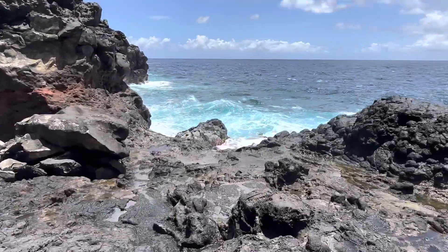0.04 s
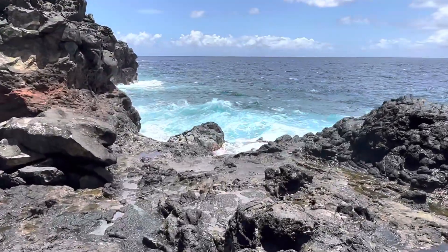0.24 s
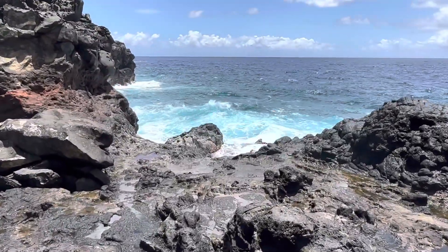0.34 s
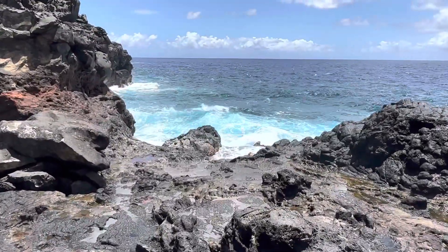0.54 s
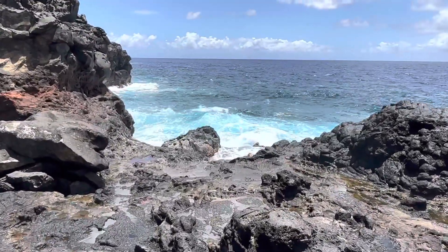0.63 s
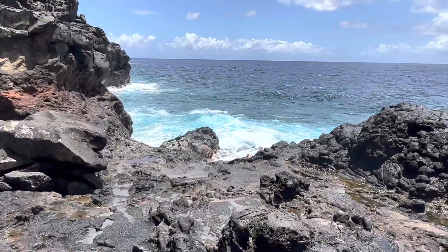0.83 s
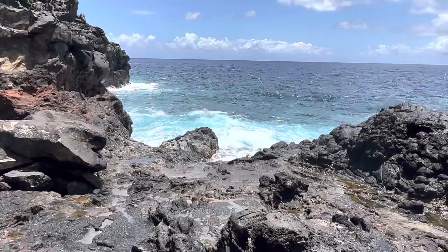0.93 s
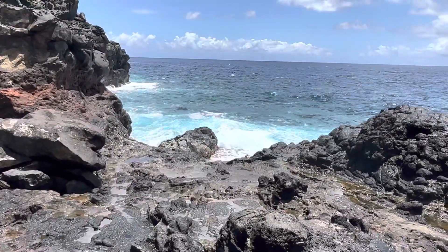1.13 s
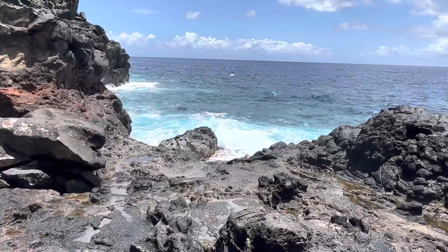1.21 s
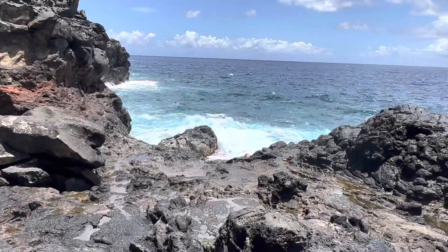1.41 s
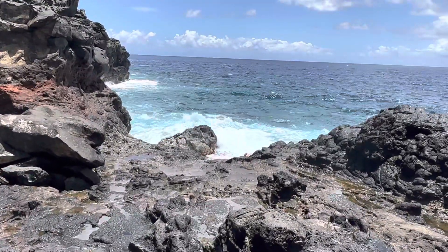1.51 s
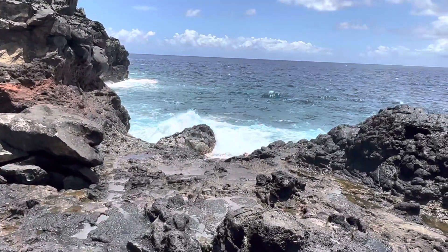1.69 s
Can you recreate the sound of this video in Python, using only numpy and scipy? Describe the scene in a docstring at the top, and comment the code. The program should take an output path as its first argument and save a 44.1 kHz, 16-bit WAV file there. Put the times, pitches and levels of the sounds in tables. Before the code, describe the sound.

Wind buffets the microphone outdoors on a rocky shore: a mild low rumble first, then a violent cluster of dull thumps and flutters midway, then easing. Faint wide surf roars and hisses steadily behind.

```python
"""Gusty wind rumbles on the microphone ports and sheds eddies that thump past as short falling flutters.
Behind it surf washes over a rocky shore some way off: a wide roar and hiss, with one small slap.
Wind and surf are shaped noise, each eddy is a gliding tone with a rasp, the slap is a noise burst.
A limiter ducks the whole scene after the hardest thumps."""
import sys
import numpy as np
from scipy import signal
from scipy.fft import rfft, irfft
from scipy.io import wavfile

SR = 44100
rng = np.random.default_rng(int(sys.argv[2]) if len(sys.argv) > 2 else 0)


def pcm_store(signal):
    """Save signal as 16-bit PCM."""
    levels = np.round(np.clip(np.atleast_2d(signal), -1, 1) * 32767)
    wavfile.write(sys.argv[1], SR, levels.astype(np.int16).T)


N = 77175

# Wind strength on the ports: (time [s], rumble level [dB], flutter level [dB])
WIND_LEVELS = [(0, -44.5, -33.5), (.11, -33, -46), (.235, -21, -38.5), (.316, -27.5, -39.5),
               (.414, -26, -42), (.536, -28, -38.5), (.594, -32, -34.5), (.638, -25, -38.5),
               (.728, -32, -38.5), (.756, -9.5, -23), (.808, -25, -35.5), (.875, -21.5, -27),
               (.905, -8.5, -34.5), (.96, -17, -24.5), (.994, -13, -20.5), (1.116, -16, -24),
               (1.17, -27.5, -32), (1.222, -23, -21), (1.26, -32.5, -48), (1.36, -26, -36.5),
               (1.49, -26, -36.5), (1.602, -38, -44.5), (1.63, -29, -43), (1.75, -34.5, -43.5)]
# Shape of the low wind noise: (frequency [Hz], relative density [dB per Hz])
RUMBLE_SPECTRUM = [(22, -19), (40, -11.5), (64, 1), (119, -4.5), (177, -10.5), (260, -25), (340, -33)]
# Shape of the faster wind noise: (frequency [Hz], relative density [dB per Hz])
FLUTTER_SPECTRUM = [(120, -7), (190, -2), (350, -7), (450, -13), (750, -23), (1200, -46)]
# Eddies passing the ports:
# (time [s], nominal peak level [dB], starting pitch [Hz], closing pitch [Hz], length [s])
EDDY_EVENTS = [(0.226, -13, 214, 97, 0.012), (0.753, -11, 544, 195, 0.0068),
               (0.769, -4.5, 480, 180, 0.0047), (.83, -19.5, 423, 241, 0.016),
               (.892, -4.5, 630, 276, 0.0068), (.924, -11, 110, 58.7, 0.056),
               (0.939, -8.5, 650, 200, 0.0076), (0.966, -8.5, 550, 203, 0.017),
               (0.982, 2, 1500, 212, 0.0089), (0.999, 1.5, 480, 218, 0.0088),
               (1.034, -5.5, 430, 193, 0.009), (1.063, -15.5, 722, 247, 0.01),
               (1.074, -9.5, 480, 168, 0.0059), (1.102, -9, 567, 171, 0.0096),
               (1.112, -12.5, 810, 320, 0.0066), (1.132, -10, 420, 353, 0.014),
               (1.144, -4.5, 400, 200, 0.009), (1.162, -13.5, 480, 357, 0.0062),
               (1.17, -7.5, 487, 392, 0.0055), (1.185, -4.5, 540, 317, 0.0036),
               (1.208, -5, 1295, 240, 0.0047), (1.32, -13, 633, 320, 0.012), (1.36, -16, 396, 163, 0.0063),
               (1.395, -19, 420, 248, 0.0069), (1.435, -17, 376, 330, 0.01), (1.448, -8, 1516, 212, 0.0053),
               (1.466, -16, 605, 403, 0.0048), (1.5419, -12, 850, 201, 0.0057),
               (1.623, -16.5, 750, 109, 0.009)]
# Course of the surf; the hiss counts by its departure from its mean:
# (time [s], roar level [dB], hiss level [dB], left minus right [dB])
SURF_LEVELS = [(0, -37, -60.5, -2), (.18, -36, -53.5, -1), (.32, -37, -58, -1), (.75, -37.5, -59, 1),
               (1.15, -41, -55.5, 0.5), (1.33, -38, -54, 1), (1.75, -39.5, -53.5, 0.5)]
# Shape of the surf noise: (frequency [Hz], relative density [dB per Hz])
SURF_SPECTRUM = [(120, 5), (170, -4.5), (560, -11.5), (800, -9.5), (1300, -17), (1700, -18.5),
                 (2400, -21.5), (4700, -26), (6500, -28), (8300, -33), (10300, -33.5), (12000, -40.5),
                 (15400, -41)]
# Stereo coherence of the surf: (frequency [Hz], left-right likeness [0 to 1])
SURF_ALIKE = [(150, 1), (300, 0.43), (640, 0.68), (1400, 0.022), (8500, 0.026), (11800, 1), (14200, 0.2)]
# Stereo balance of the surf: (frequency [Hz], left minus right [dB])
SURF_LEAN = [(300, 0), (800, 3.5), (2400, -3), (4400, 3), (8000, 2), (14000, -1.5)]

RUMBLE_LUMP_DB, FLUTTER_LUMP_DB = 1.7, 3.5   # spread of the level changes
RUMBLE_LUMP_HZ, FLUTTER_LUMP_HZ = 24.5, 49   # corner rate of the level changes
RUMBLE_ALIKE, FLUTTER_ALIKE = 0.92, 0.94   # left-right likeness

SURF_PATCHY_DB, HISS_FROM_HZ = 1.7, 6600

EDDY_FALL_S, EDDY_ATTACK_S = 0.002465, 0.0034
EDDY_WOBBLE = 0.26   # fraction of the pitch
EDDY_TILT = 0.61   # exponent: fast swings are weaker
OVERTONE_DB = -18   # makes each swing lopsided
SNAP_DB, SNAP_S, SNAP_CUT_HZ = -33, 0.0015, 1420   # rasp; the dB are for an eddy starting at 1 kHz
EDDY_RIGHT_CUT_HZ, EDDY_RIGHT_DB = 545, -0.44   # the right port is more sheltered: duller

SPLASH_S, SPLASH_DB, SPLASH_HZ, SPLASH_LENGTH_S = 0.449, -35, 1160, 0.0042

LIMIT_DB, LIMIT_RATIO = -4, 0.62   # threshold; dB of ducking per dB of held excess
RELEASE_DB_PER_S = 26   # fall of the held excess
CUTOFF_HZ = 15400

LEFT_RIGHT = np.array([[1], [-1]])


def amp(db):
    """Decibels are twenty times the logarithm of amplitude; this inverts them."""
    return 10 ** (np.asarray(db) / 20)


def rms_one(x):
    """Dividing by the root mean square gives unit effective level."""
    return x / np.sqrt(np.mean(x ** 2) + 1e-20)


def in_time(rows):
    """Linear interpolation turns each column into a continuous course in time."""
    times, *columns = np.transpose(rows)
    return [np.interp(np.arange(N) / SR, times, column) for column in columns]


def at_hz(points, hz):
    """Interpolation over log frequency gives equal weight to equal musical intervals."""
    table_hz, values = np.transpose(points)
    return np.interp(np.log(hz), np.log(table_hz), values)


def drift(corner_hz):
    """White noise through two equal poles becomes a slow random course of unit spread."""
    step, settle = 20, 3000   # computed at every 20th sample, after the filter has settled
    pole = np.exp(-2 * np.pi * corner_hz * step / SR)
    noise = rng.standard_normal(N // step + settle + 2)
    slow = signal.lfilter([1], [1, -2 * pole, pole * pole], noise)[settle:]
    return np.interp(np.arange(N) / step, np.arange(len(slow)), rms_one(slow - slow.mean()))


def left_right(mid, side, alike):
    """Sum and difference of independent noises give two channels of chosen correlation."""
    alike = np.clip(alike, 0, 1)
    return np.sqrt(1 + alike) * mid + np.sqrt(1 - alike) * side * LEFT_RIGHT


def colour(x, spectrum):
    """Weighting in the frequency domain shapes a spectrum, steep outside its ends, to rms 1."""
    hz = np.maximum(np.arange(N // 2 + 1) * SR / N, 1)
    low, high = spectrum[0][0], spectrum[-1][0]
    skirt = np.minimum(1, (hz / low) ** 3) * np.minimum(1, (high / hz) ** 3)
    return rms_one(irfft(rfft(x) * amp(at_hz(spectrum, hz)) * skirt, N))


def lumpy_noise(alike, lump_db, lump_hz, spectrum):
    """Random amplitude modulation makes steady noise lumpy, together on both ports."""
    mid, side = rng.standard_normal((2, N))
    lumps = amp(lump_db * drift(lump_hz))
    return colour(left_right(mid, side, alike) * lumps, spectrum)


def wind():
    """Turbulent pressure at the ports: low rumble and faster flutter, nearly alike on both."""
    rumble_db, flutter_db = in_time(WIND_LEVELS)
    rumble = lumpy_noise(RUMBLE_ALIKE, RUMBLE_LUMP_DB, RUMBLE_LUMP_HZ, RUMBLE_SPECTRUM)
    flutter = lumpy_noise(FLUTTER_ALIKE, FLUTTER_LUMP_DB, FLUTTER_LUMP_HZ, FLUTTER_SPECTRUM)
    return amp(rumble_db) * rumble + amp(flutter_db) * flutter


def surf():
    """Superposed half-octave noise bands, each wavering partly with the others, partly alone."""
    roar_db, hiss_db, pan_db = in_time(SURF_LEVELS)
    together = drift(20)
    edges = 140 * 2 ** np.arange(0, 7.1, .5)
    white = rng.standard_normal((2, 2, N))   # neighbouring bands take different noises
    wash = 0
    for k, (low, high) in enumerate(zip(edges, edges[1:])):
        band = signal.butter(2, [low, high], "band", fs=SR, output="sos")
        mid, side = signal.sosfilt(band, white[k % 2])
        hz = np.sqrt(low * high)
        hiss_share = 1 / (1 + (HISS_FROM_HZ / hz) ** 2)
        roar_swell = (1 - hiss_share) * (roar_db - roar_db.mean())
        hiss_swell = hiss_share * (hiss_db - hiss_db.mean())
        patches = SURF_PATCHY_DB * (0.28 * together + 0.64 * drift(33))
        lean = at_hz(SURF_LEAN, hz) / 2 * LEFT_RIGHT
        gain = amp(roar_swell + hiss_swell + patches + lean)
        wash = wash + gain * left_right(mid, side, at_hz(SURF_ALIKE, hz))
    return amp(roar_db.mean() + pan_db / 2 * LEFT_RIGHT) * colour(wash, SURF_SPECTRUM)


def eddies():
    """Vortex passage: a short rasp and a few uneven pressure swings whose pitch drops fast."""
    out = np.zeros(N + SR)
    t = np.arange(SR // 20) / SR
    low_pass = signal.butter(2, SNAP_CUT_HZ, fs=SR, output="sos")
    rasp = rms_one(signal.sosfilt(low_pass, rng.standard_normal(N + SR)))
    attack = np.sin(np.pi / 2 * np.minimum(t / EDDY_ATTACK_S, 1)) ** 2
    snap_shape = (t / SNAP_S * np.exp(1 - t / SNAP_S)) ** 2

    for start_s, db, start_hz, end_hz, length_s in EDDY_EVENTS:
        phase, wobble_phase, wobble_speed = rng.random(3)
        glide = end_hz + (start_hz - end_hz) * np.exp(-t / EDDY_FALL_S)
        wobble = np.sin(2 * np.pi * (wobble_phase + t * 90 * (1 + wobble_speed)))   # 90 to 180 Hz
        pitch = glide * (1 + EDDY_WOBBLE * wobble)
        turn = 2 * np.pi * (phase + np.cumsum(pitch) / SR)
        decay = np.exp(-(t / max(length_s, .002)) ** 2)
        shape = attack * decay * (end_hz / glide) ** EDDY_TILT
        swings = shape * (np.sin(turn) + amp(OVERTONE_DB) * np.cos(2 * turn))

        first = int(start_s * SR)
        span = slice(first, first + len(t))
        # the rasp grows with the square of the starting pitch
        snap = amp(SNAP_DB) * (start_hz / 1000) ** 2 * snap_shape * rasp[span]
        out[span] += amp(db) * (swings + snap)

    left = out[:N]
    right = signal.lfilter(*signal.butter(1, EDDY_RIGHT_CUT_HZ, fs=SR), left)
    return np.array([left, amp(EDDY_RIGHT_DB) * right])


def splash():
    """Impact noise: water slaps rock in a brief octave-wide burst, unlike in the two ears."""
    edges = [SPLASH_HZ / np.sqrt(2), SPLASH_HZ * np.sqrt(2)]
    band = signal.butter(2, edges, "band", fs=SR, output="sos")
    noise = rms_one(signal.sosfilt(band, rng.standard_normal((2, N))))
    burst = np.exp(-((np.arange(N) / SR - SPLASH_S) / SPLASH_LENGTH_S) ** 2)
    return amp(SPLASH_DB) * burst * noise


def scene():
    """Superposition: the pressures of all sources add."""
    return wind() + surf() + eddies() + splash()


def record(dry):
    """Peak limiting with look-ahead and slow release, then a low-pass that cuts the top."""
    peak_db = 20 * np.log10(np.abs(dry).max(0) + 1e-9)
    over = np.maximum(peak_db - LIMIT_DB, 0)
    # a running maximum on a rising ramp holds each peak and lets it fall steadily
    ramp = RELEASE_DB_PER_S * np.arange(N) / SR
    held = np.maximum.accumulate(over + ramp) - ramp
    smooth = signal.lfilter([.03], [1, -.97], held)
    duck_db = LIMIT_RATIO * np.roll(smooth, -SR // 500)   # about 2 ms early
    low_pass = signal.cheby2(30, 60, CUTOFF_HZ, fs=SR, output="sos")
    return signal.sosfilt(low_pass, dry * amp(-duck_db))


dry = scene()
out = record(dry)
pcm_store(out)
```